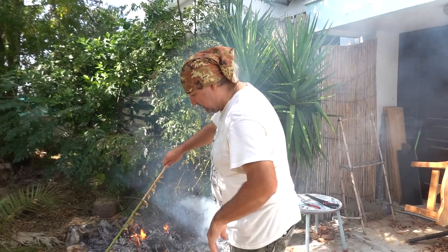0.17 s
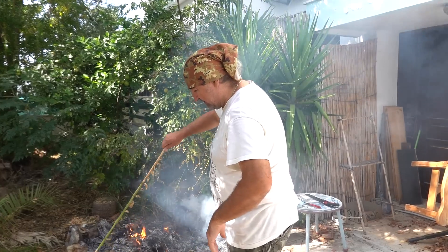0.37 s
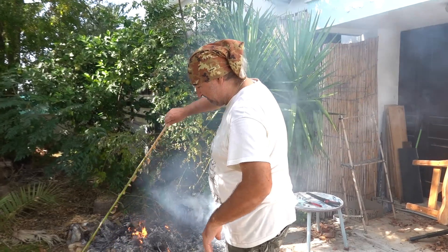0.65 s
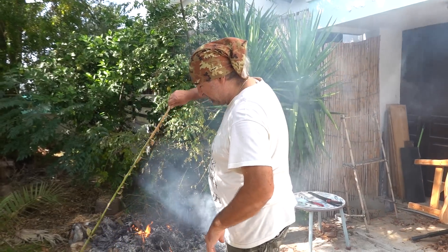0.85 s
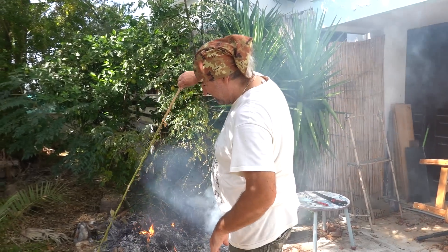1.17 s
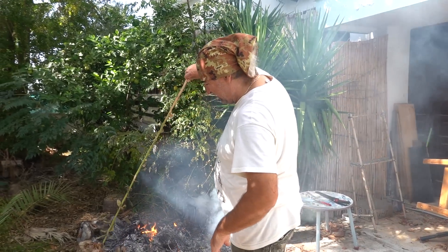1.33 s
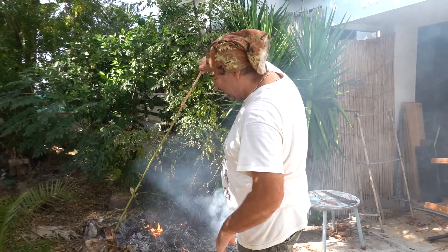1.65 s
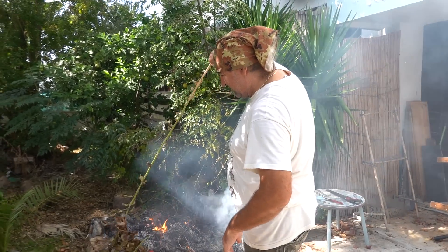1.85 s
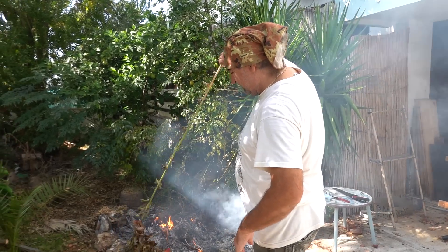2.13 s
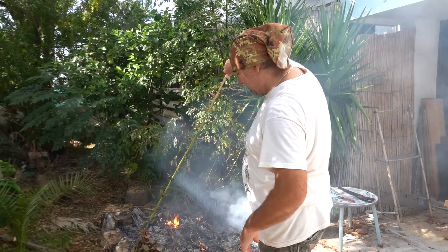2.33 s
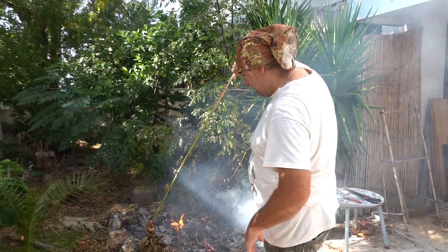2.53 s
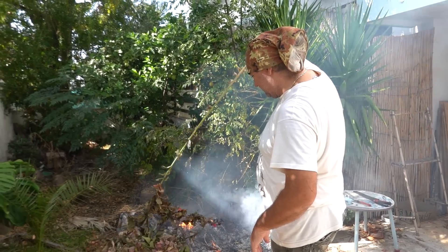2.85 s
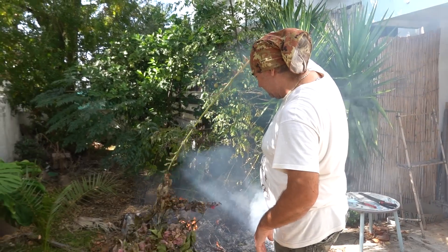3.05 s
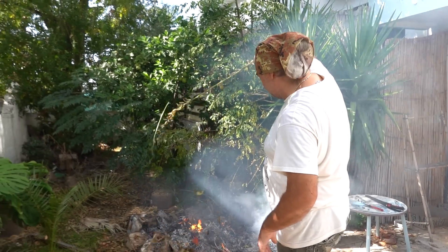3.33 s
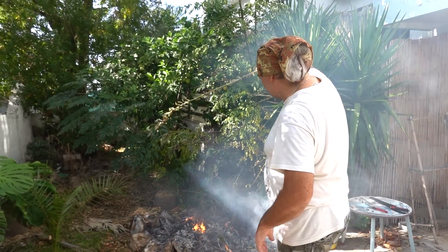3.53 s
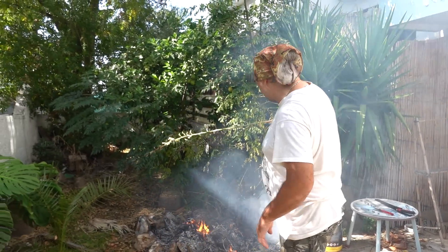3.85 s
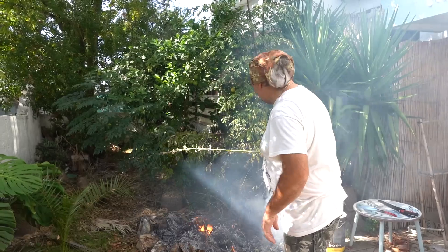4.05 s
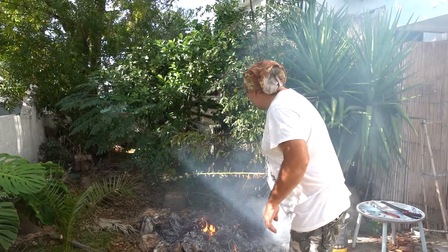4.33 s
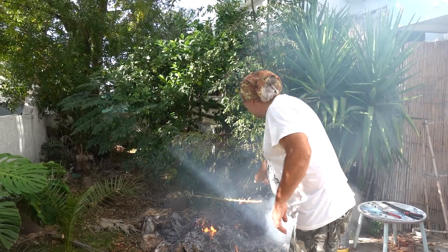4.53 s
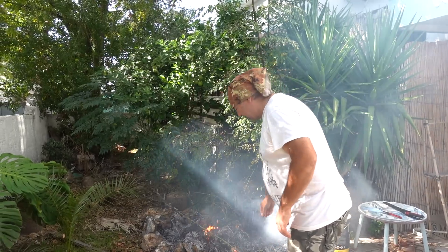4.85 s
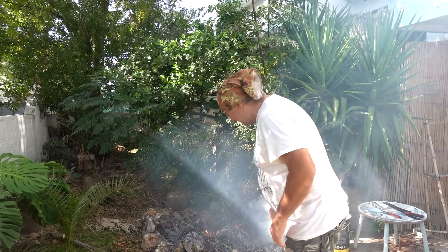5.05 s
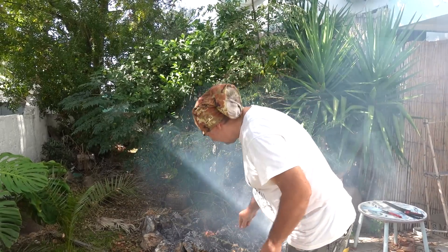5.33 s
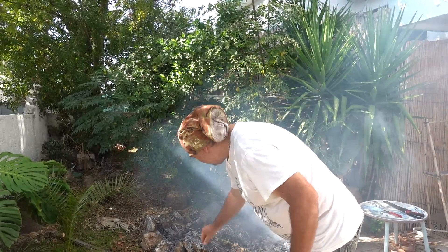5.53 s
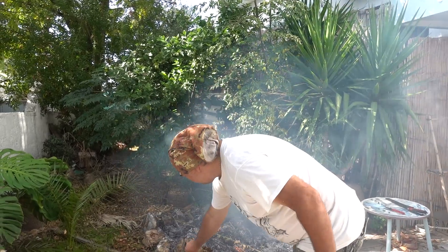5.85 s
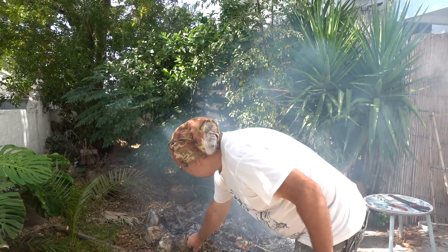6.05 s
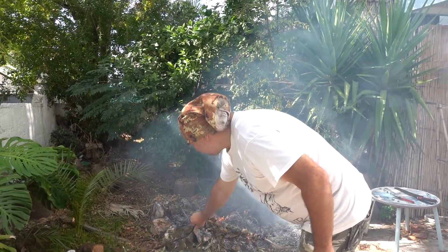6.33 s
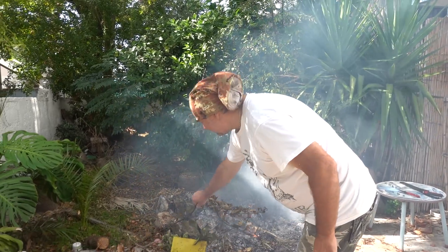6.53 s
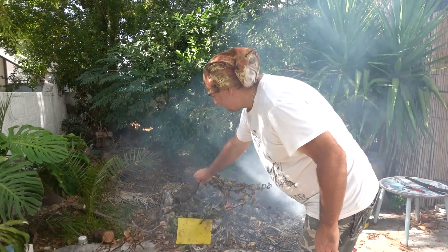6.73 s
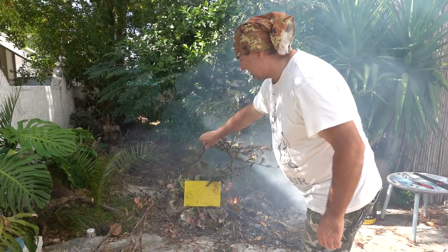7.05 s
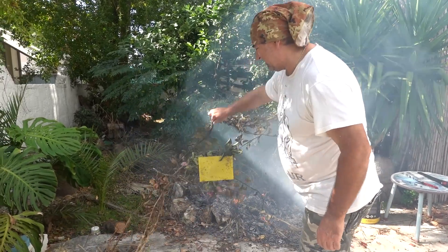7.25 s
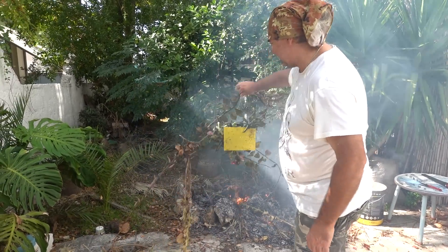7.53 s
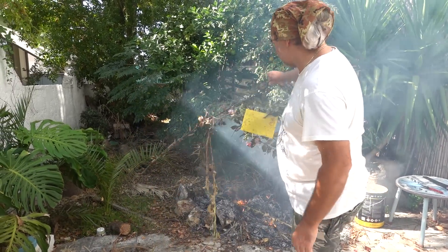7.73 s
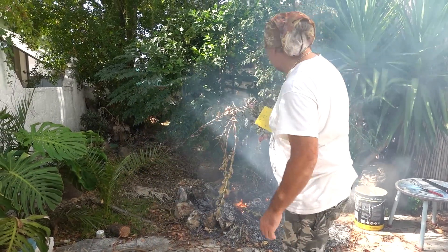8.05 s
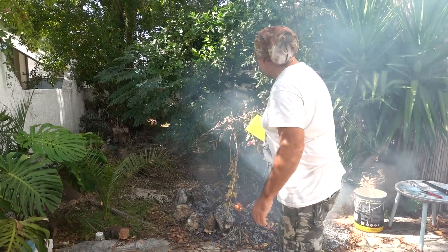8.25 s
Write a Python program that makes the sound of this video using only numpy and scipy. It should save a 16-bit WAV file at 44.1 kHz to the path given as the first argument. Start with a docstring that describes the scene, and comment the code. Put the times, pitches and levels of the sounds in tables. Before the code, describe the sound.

Dry leafy branches rustle and drag in crackling surges outdoors, drop to a hush with sparse twig ticks, then rustle again.

```python
"""A walled garden: dry leafy branches are dragged over a smouldering bonfire, left of the listener.
Brittle leaves rustle in surges: noise is coloured, made grainy and given the strength of each pull.
Jolts are bursts of noise, snapping twigs are very short rings, and struck hollow stems are fading notes.
In the lull, single ticks stand over the hush of the neighbourhood, which is smooth noise,
and a faint low coo, perhaps a distant dove, made of wavering tones."""
import sys
import numpy as np
from scipy import signal
from scipy.fft import rfft, irfft
from scipy.io import wavfile
from scipy.ndimage import uniform_filter1d

SR = 44100
rng = np.random.default_rng(int(sys.argv[2]) if len(sys.argv) > 2 else 0)


def output_pcm(signal):
    """Save a mono or channel-first signal as 16-bit PCM at the path in sys.argv[1].

    Samples are clipped to [-1, 1] before scaling.
    """
    pcm = np.clip(np.atleast_2d(signal).T, -1, 1) * 32767
    wavfile.write(sys.argv[1], SR, np.round(pcm).astype(np.int16))


N = 369558  # length of the scene in samples


def gain_of(db):
    """Turns decibels into a factor for the amplitude."""
    return 10 ** (np.asarray(db) / 20)


def evened(x):
    """Scales a signal to an average strength (rms) of 1."""
    return x / np.sqrt(np.mean(np.abs(x) ** 2) + 1e-20)


def read(points, hz):
    """Reads a table between its points, with pitch spaced as the ear hears it (logarithmic)."""
    f, value = np.transpose(points)
    return np.interp(np.log(hz + 1), np.log(f + 1), value)


def add(mix, s, sound):
    """Mixes a sound in at a time in seconds, cut off at the end of the scene."""
    part = mix[..., round(s * SR):][..., :sound.shape[-1]]
    part += sound[..., :part.shape[-1]]


def to_ports(pair, lead_s):
    """Blends two unrelated noises into two microphone ports; the right one hears lead_s later."""
    # how alike left and right are, from 0 (unrelated) to 1 (the same): f/Hz, likeness
    likeness = [(60, 0.68), (200, 0.97), (700, 0.85), (1300, 0.77), (2400, .45), (4400, 0.41),
                (9000, 0.083)]
    size = pair.shape[1]
    hz = np.fft.rfftfreq(size, 1 / SR)
    same = np.clip(read(likeness, hz), 0, 1)
    left, other = rfft(pair)
    right = same * left + np.sqrt(1 - same ** 2) * other
    right = right * np.exp(-2j * np.pi * hz * lead_s)
    return irfft(np.array([left, right]), size)


def patchy(pair, spectrum_db, patch_db, size):
    """Colours noise frame by frame, with drifting louder and softer patches in time and pitch."""
    hz, t, z = signal.stft(pair, SR, nperseg=size)
    patches = rng.standard_normal(z.shape[1:])
    patches = uniform_filter1d(patches, size=7, axis=0)
    patches = evened(uniform_filter1d(patches, size=7, axis=1))
    coloured = z * gain_of(spectrum_db(hz, t) + patch_db * patches)
    return signal.istft(coloured, SR, nperseg=size)[1][:, :N]


def crumple(per_s, spread_db, t60):
    """Loudness of many tiny breaks: each starts at once and fades 60 dB in t60 s; a few are large."""
    happens = rng.random(N) < per_s / SR
    size = gain_of(2 * spread_db * np.minimum(rng.exponential(1, N), 5)) * happens
    power = signal.lfilter([1], [1, -gain_of(-120 / (t60 * SR))], size)
    return np.sqrt(power / power.mean())


def rustle():
    """Leaves crackle densely; stems add weight below and dry edges add hiss above."""
    # basic colour of the leaves: f/Hz, level/dB
    leaves = [(60, -80), (150, -50), (250, -23), (413, -19.5), (717, -9), (1000, -8.5), (1900, -5),
              (3960, 1), (7000, -0.5), (12000, -1), (15500, -3)]
    # how the colour changes: t/s, boost of the stems' low middle/dB, boost of the edges' treble/dB
    load = [(0.0, 4, 0.5), (0.4, 1, 0), (1.2, 6, -1.4), (1.68, 5.5, -2.5), (2.16, 2.5, -3), (2.7, 4.5, -1),
            (3.2, 0.5, 0.5), (3.84, 1.2, -2.5), (4.45, 16, 1), (4.7, 1, 5), (5.03, 9.5, -0.5),
            (5.32, 11, 1.5), (5.8, -6, -4), (6.3, -4, -3), (6.52, 2, -3), (7.18, 2, 2), (7.8, -4, -0.5),
            (8.04, 0.5, 1), (8.2, -5, 2.5), (8.38, -6, 2)]
    # where the branches lie: t/s, left over right in the middle band/dB
    place = [(0, 4.5), (1.6, 2.5), (3.0, 2.5), (3.9, .6), (6.5, 1.5), (7.0, 2.5), (7.9, 0), (8.38, .6)]
    grains = crumple(110, spread_db=2.0, t60=0.17)
    noise = rng.standard_normal((2, N)) * (1.7 + grains)
    # the dry edges flicker by themselves, faster than the mass of leaves
    edge_noise = signal.lfilter(*signal.butter(2, 6000, "highpass", fs=SR), noise)
    edge_flicker = crumple(60, spread_db=3.0, t60=0.15) - 1
    noise = noise + 0.32 * edge_noise * edge_flicker
    s, stems_db, edges_db = np.transpose(load)

    def colour(hz, t):
        """Level in dB at each pitch and time."""
        # shares from 0 to 1: the stems fade out above and below their band, the edges fade in above
        below_treble = np.clip(np.log2(4200 / (hz + 1)) / 1.8, 0, 1)
        above_bass = np.clip(np.log2((hz + 1) / 70) / 1.5, 0, 1)
        stems = (below_treble * above_bass)[:, None]
        edges = np.clip(np.log2((hz + 1) / 5000) / 1.2, 0, 1)[:, None]
        moved = stems * np.interp(t, s, stems_db) + edges * np.interp(t, s, edges_db)
        return read(leaves, hz)[:, None] + moved

    bed = patchy(noise, colour, patch_db=1.3, size=512)
    bed = evened(to_ports(bed, lead_s=4.5e-5))
    t = np.arange(N) / SR
    sound = (bed + gain_of(-13) * small_breaks()) * gain_of(effort_db(t))
    # the nearer port hears more of the middle band
    middle_band = signal.butter(1, [600, 6000], "bandpass", fs=SR, output="sos")
    middle = signal.sosfiltfilt(middle_band, sound)
    side_db = np.interp(t, *np.transpose(place)) / 2
    return sound + middle * (gain_of([side_db, -side_db]) - 1)


def effort_db(t):
    """Loudness of the rustle: the steady drag plus each tug or drop, added as power."""
    # how steadily the branches are dragged: t/s, level/dB
    drag = [(0.0, -42), (0.1, -41), (0.4, -28), (1.12, -24.5), (1.38, -27), (1.67, -30), (1.78, -26.5),
            (2.01, -23.5), (2.19, -28), (2.5, -33), (2.68, -31.5), (2.75, -28), (3.0, -27), (3.07, -32),
            (3.67, -31), (3.86, -34.5), (3.96, -44), (4.16, -53.5), (4.37, -53.5), (4.66, -68),
            (4.98, -49.5), (5.27, -55), (5.65, -62), (5.97, -57), (6.24, -46), (6.61, -37), (6.75, -29),
            (7.05, -24.5), (7.36, -34), (7.61, -42), (8.0, -51), (8.38, -43)]
    # single tugs and drops: peak t/s, level/dB, time to swell by 10 dB/s, time to fade by 10 dB/s
    tugs = [(0.13, -26, .025, .14), (0.284, -26, .03, .3), (0.735, -24.5, .025, .35),
            (1.515, -26.5, .05, .11), (2.4, -25.5, .3, .085), (2.893, -26, .02, .1),
            (3.093, -22.5, .015, .33), (3.45, -18.5, .1, .14), (3.632, -24.5, .08, .05),
            (3.766, -27, .1, .05), (4.7, -38.5, .011, .25), (4.81, -38, .05, .05), (5.042, -30, .02, .08),
            (5.09, -36, .03, .03), (5.305, -54, .015, .2), (6.2, -47, .025, .04), (6.385, -36, .025, .15),
            (6.525, -31.5, .08, .09), (6.655, -32, .04, .2), (7.209, -27, .08, .06), (7.328, -30, .06, .04),
            (7.458, -27.5, .12, .09), (7.737, -29, .04, .15), (8.052, -43, .04, .2),
            (8.217, -29, .035, .055)]
    swell_shape, fade_shape = 1.2, 1.5  # powers of time: over 1 the peak is rounded
    power = gain_of(2 * np.interp(t, *np.transpose(drag)))
    for s, level_db, swell_s, fade_s in tugs:
        before = np.maximum(s - t, 0) / swell_s
        after = np.maximum(t - s, 0) / fade_s
        tug_db = level_db - 10 * before ** swell_shape - 10 * after ** fade_shape
        power = power + gain_of(2 * tug_db)
    return 10 * np.log10(power)


def small_breaks():
    """Single leaves and stalks crack at random, in sixteen pitches, each with its own two-ear balance."""
    out = np.zeros((2, N))
    for hz in np.geomspace(1800, 12000, num=16):
        happens = rng.random(N) < 25 / SR  # about 25 a second
        size = gain_of(1.8 * np.minimum(rng.exponential(1, N), 4)) * happens
        pan = rng.uniform(0.17, 1, (2, 1))
        cracks = signal.oaconvolve(size, tick(hz, cycles=8.4, crack=0))[:N]
        # short high cracks are sharper for the same energy
        out += pan * np.sqrt(hz) * cracks
    return evened(out)


def jolt(peak_db, hz, octaves, t60):
    """Shaken leaves burst out at once as a band of noise, then shiver and settle."""
    t = np.arange(round(.35 * SR)) / SR
    spread = 2 ** (max(octaves, .3) / 2)
    band = signal.butter(2, [hz / spread, min(hz * spread, 20000)], "bandpass", fs=SR)
    shiver = evened(signal.lfilter(*band, rng.standard_normal((2, len(t)))))
    fade = gain_of(-60 * t / max(t60, .02)) * (1 - np.exp(-t / .0005))
    # noise peaks stand at roughly three times its rms
    return gain_of(peak_db) / 3 * to_ports(shiver, lead_s=3e-5) * fade


def tick(hz, cycles, crack):
    """A break may crack in all bands at once; its ring fades 60 dB in a few cycles. The peak is 1."""
    t = np.arange(400) / SR
    ring = np.sin(2 * np.pi * hz * t) * gain_of(-60 * t * hz / cycles)
    ring = ring + crack * (t == 0)
    ring = signal.lfilter(*signal.butter(2, min(hz / 2, 3000), "highpass", fs=SR), ring)
    return ring / abs(ring).max()


def knock(peak_db, hz, t60):
    """A struck hollow stem rings: one soft note that fades 60 dB in t60 s."""
    t = np.arange(round(.2 * SR)) / SR
    soft_start = 1 - np.exp(-t / 0.0033)
    return gain_of(peak_db - 60 * t / t60) * np.sin(2 * np.pi * hz * t) * soft_start


def coo(length, level_db, hz):
    """A far, nearly pure tone, blurred by the air into a wavering narrow band."""
    t = np.arange(0, length, 1 / SR)
    slow = uniform_filter1d(rng.standard_normal((2, len(t))), size=1500)
    a, b = uniform_filter1d(slow, size=1500)
    waver = 1 + 0.9 * evened(a + 1j * b)  # shifts both strength and phase
    tone = evened((waver * np.exp(2j * np.pi * hz * t)).real)
    return gain_of(level_db) * tone * signal.windows.tukey(len(t), .08)


def hush():
    """The far wash of the neighbourhood: noise that is smooth above and lumpy in the bass."""
    # colour of the wash: f/Hz, level/dB
    wash_colour = [(30, -42), (70, -27), (150, -11.5), (230, -3.5), (560, 0.5), (1000, -0.5), (1700, -1),
                   (2600, -8), (4200, -17), (6000, -41), (10500, -28), (15500, -27)]
    bass = np.fft.rfftfreq(2048, 1 / SR)[:, None] < 200
    noise = rng.standard_normal((2, N))

    def colour(hz, t):
        """Level in dB at each pitch, the same at all times."""
        return read(wash_colour, hz)[:, None]

    wash = patchy(noise, colour, patch_db=0.9 + 2.5 * bass, size=2048)
    return gain_of(-56) * evened(to_ports(wash, lead_s=0))


def scene():
    """Mixes the rustle and hush with the jolts, snaps, knocks and the far coo."""
    # jolts that shake a bunch of leaves: t/s, rough peak/dB, middle f/Hz, width/octaves, t60/s
    jolts = [(0.0296, -22, 10300, 2.2, 0.087), (0.0997, -15.5, 4580, 2.5, 0.11),
             (0.2706, -15, 4750, 3.6, 0.089), (0.382, -13, 3900, 1.8, 0.12), (0.72, -11, 5000, 2.0, 0.16),
             (0.737, -11, 4600, 0.6, 0.17), (1.15, -20, 2140, 0.98, 0.15), (1.508, -14, 3170, 2.5, 0.1),
             (1.995, -17, 3300, 1.2, 0.1), (2.889, -16, 3700, 0.8, 0.12), (3.0786, -17, 5020, 1.2, 0.097),
             (3.162, -17, 6000, 1.5, 0.07), (3.438, -13, 4100, 1.0, 0.2), (3.476, -15, 4200, 1.0, 0.12),
             (3.9675, -24, 4200, 3, 0.13), (3.9894, -31.5, 2350, 1.1, 0.12), (4.197, -40, 8000, 2.5, 0.15),
             (4.2638, -28, 4330, 3.4, 0.25), (5.8535, -29.5, 13500, 1.3, 0.19),
             (6.2486, -31, 9750, 1.2, 0.12), (7.7022, -21.5, 5270, 0.85, 0.22),
             (8.028, -29, 9900, 1.6, 0.089), (8.299, -17, 7000, 2.8, 0.13)]
    # twigs and leaves that break: t/s, peak/dB, f/Hz
    snaps = [(0.7372, -11, 4600), (1.0423, -14, 4530), (2.408, -17, 5800), (2.6317, -24, 4700),
             (3.8705, -28, 5600), (3.9693, -23.2, 4700), (4.0458, -33, 4000), (4.0624, -35, 3500),
             (4.0916, -34, 9700), (4.1762, -38, 4420), (4.197, -30.5, 10500), (4.266, -26, 4400),
             (4.3774, -40, 3000), (5.0413, -14, 5150), (5.0962, -20, 4670), (5.7074, -46, 7500),
             (5.8525, -32, 6500), (5.8555, -27, 14000), (6.2502, -26, 9900), (7.485, -19, 4500),
             (7.622, -24, 8900), (8.1772, -26.1, 5500), (8.2821, -24, 8000), (8.2975, -14, 8060),
             (8.303, -24, 11600)]
    # hollow stems that are struck: t/s, level/dB, f/Hz, t60/s
    knocks = [(0.383, -21, 2400, 0.07), (0.785, -20, 1200, 0.045), (4.785, -40, 584, 0.095)]
    # phrases of the coo: start t/s, length/s, level/dB, f/Hz
    coos = [(2.65, .25, -58, 564), (3.4, .4, -56, 564), (3.9, .9, -63, 564), (4.05, .35, -68, 500),
            (5.55, .55, -68, 564), (5.65, .4, -70, 447), (6.25, 1.2, -62, 564), (7.6, .78, -64.5, 564)]
    mix = rustle() + hush()
    for s, *row in jolts:
        add(mix, s, jolt(*row))
    for s, peak_db, hz in snaps:
        add(mix, s, gain_of(peak_db) * tick(hz, cycles=13.0, crack=0.8))
    for s, *row in knocks:
        add(mix, s, knock(*row))
    for s, *row in coos:
        add(mix, s, coo(*row))
    return mix


def record(dry):
    """The microphone drops the deep bass; then a steep filter removes the highest treble."""
    thin = signal.lfilter(*signal.butter(2, 90, "highpass", fs=SR), dry)
    band_limit = signal.firwin(511, 15950, window=("kaiser", 9), fs=SR)  # cutoff in Hz
    return signal.oaconvolve(thin, band_limit[None], "same")


dry = scene()
out = record(dry)
output_pcm(out)
```